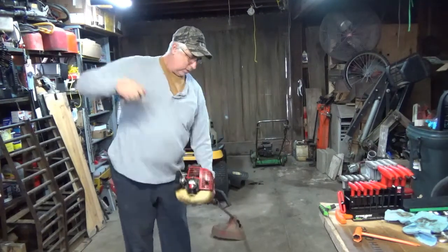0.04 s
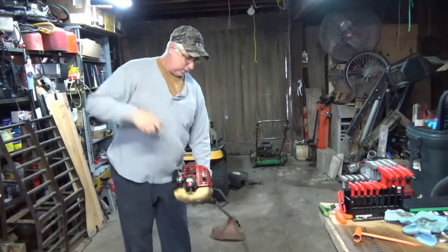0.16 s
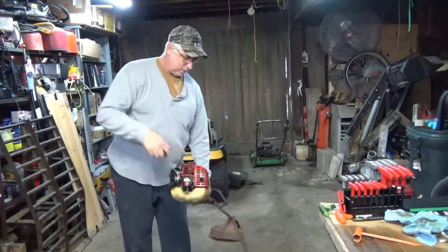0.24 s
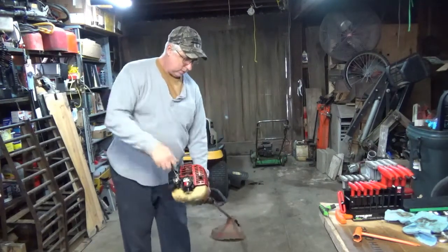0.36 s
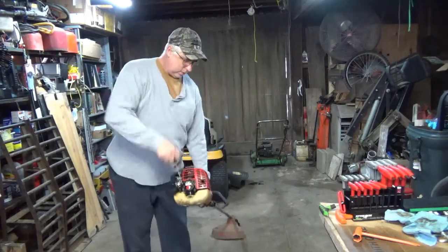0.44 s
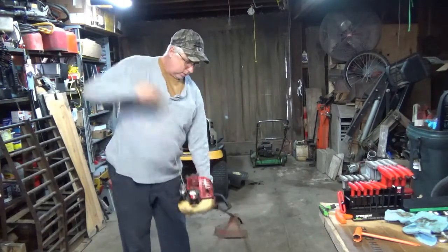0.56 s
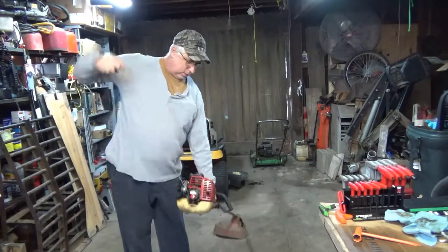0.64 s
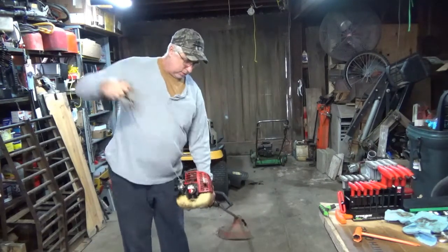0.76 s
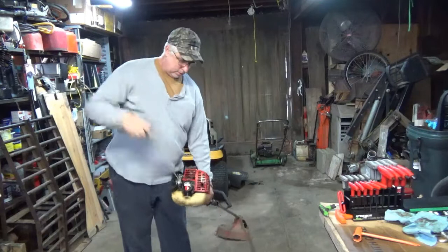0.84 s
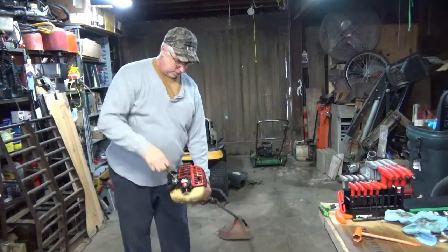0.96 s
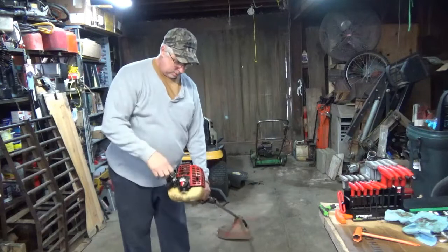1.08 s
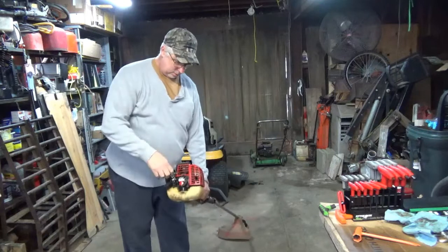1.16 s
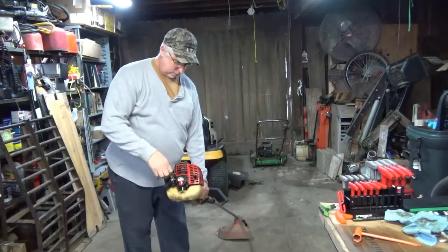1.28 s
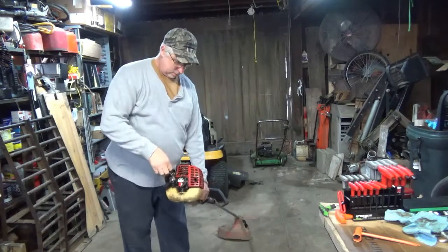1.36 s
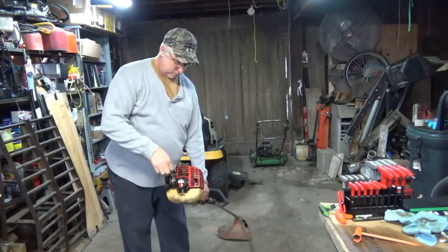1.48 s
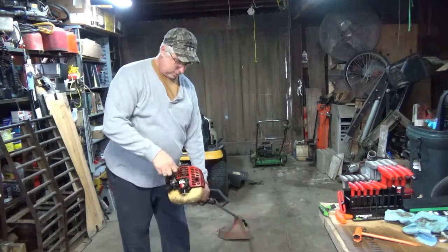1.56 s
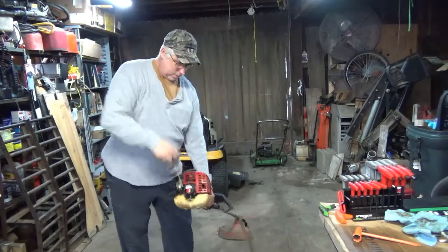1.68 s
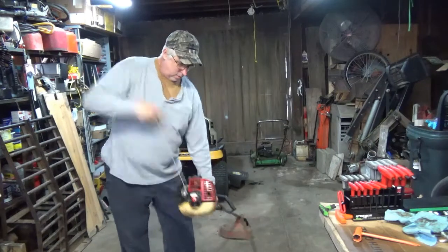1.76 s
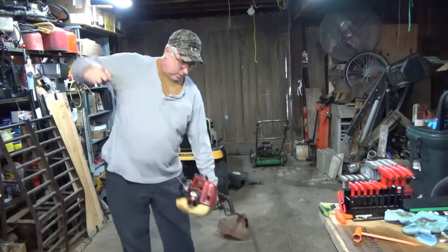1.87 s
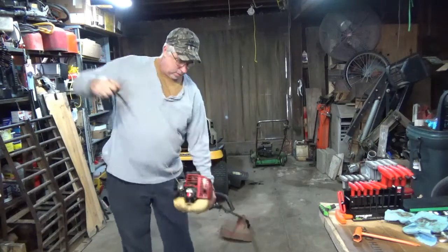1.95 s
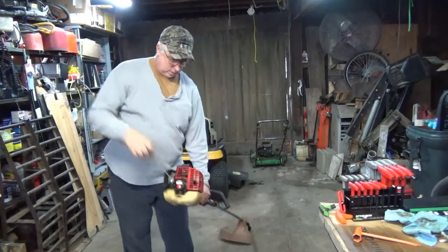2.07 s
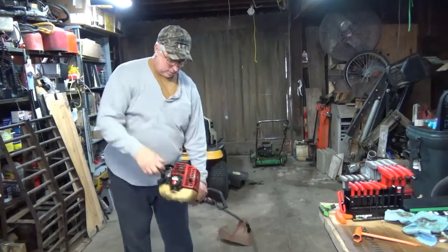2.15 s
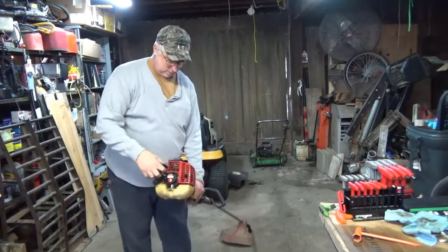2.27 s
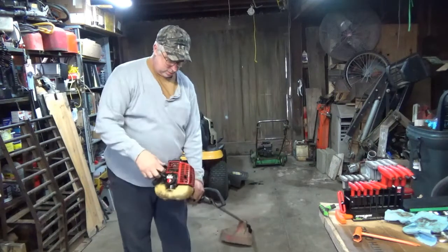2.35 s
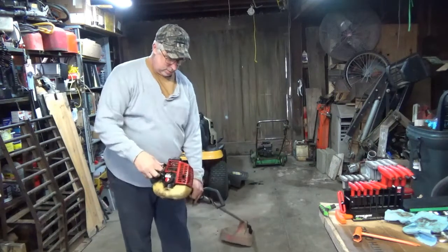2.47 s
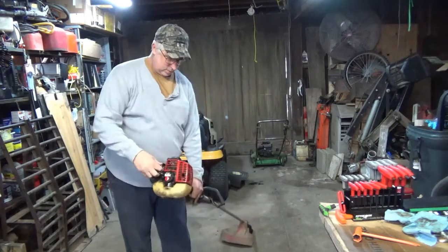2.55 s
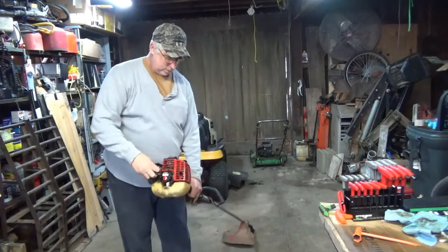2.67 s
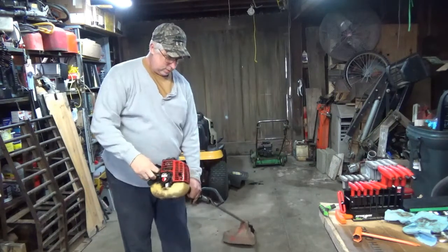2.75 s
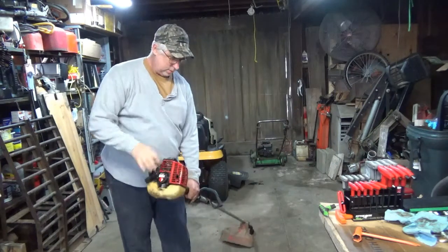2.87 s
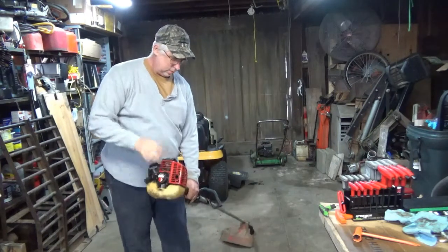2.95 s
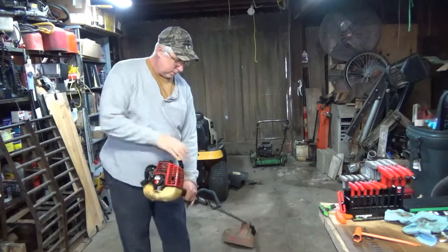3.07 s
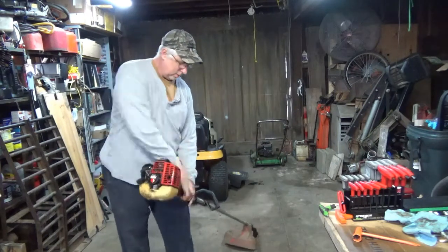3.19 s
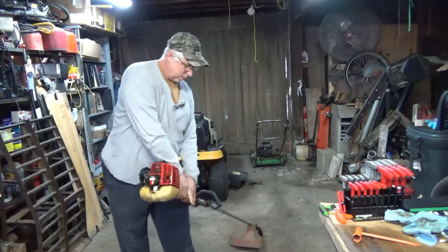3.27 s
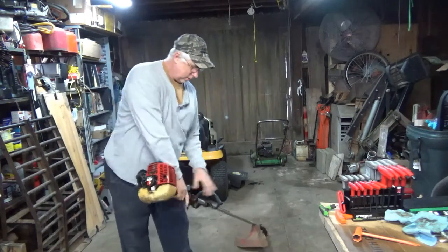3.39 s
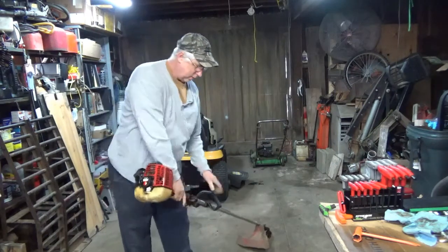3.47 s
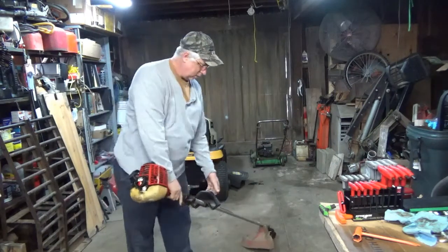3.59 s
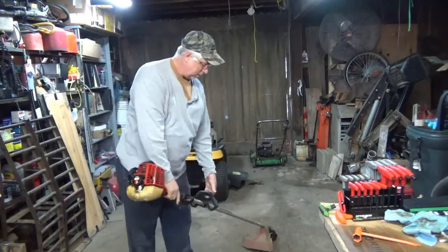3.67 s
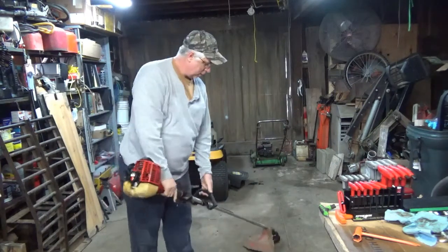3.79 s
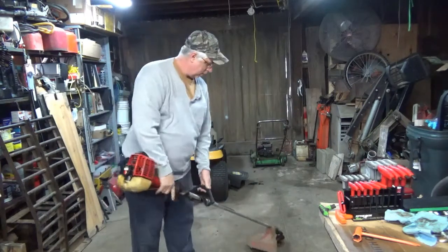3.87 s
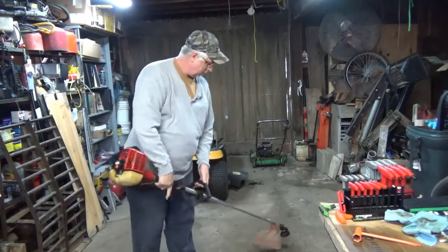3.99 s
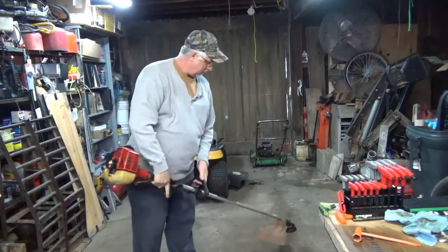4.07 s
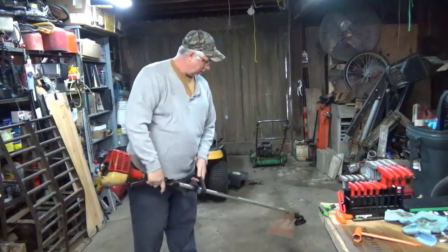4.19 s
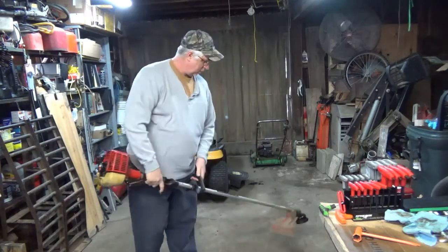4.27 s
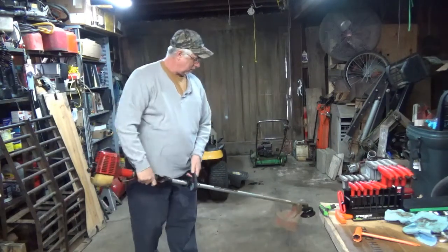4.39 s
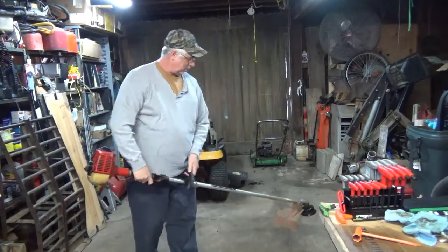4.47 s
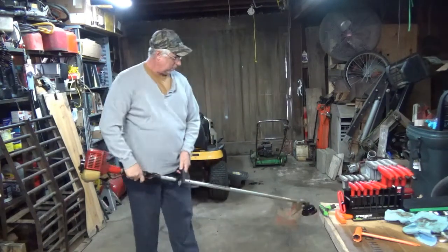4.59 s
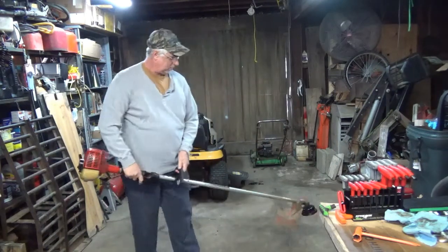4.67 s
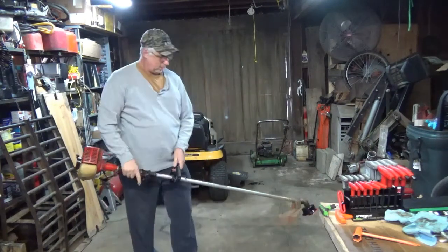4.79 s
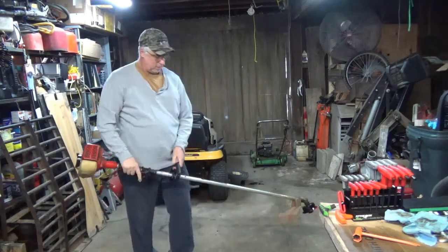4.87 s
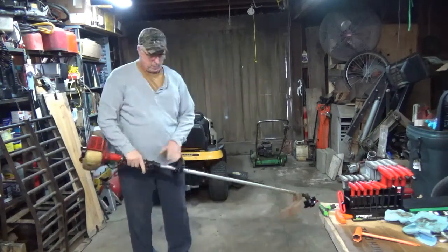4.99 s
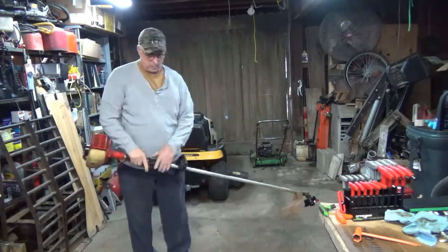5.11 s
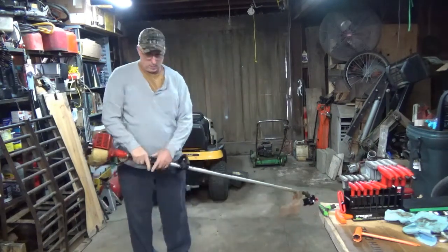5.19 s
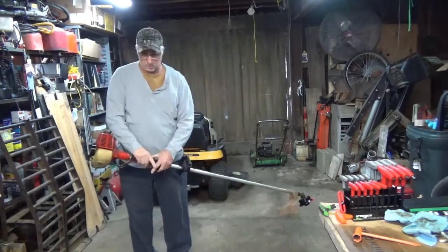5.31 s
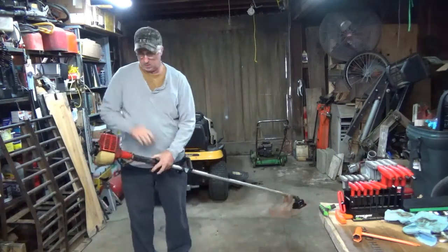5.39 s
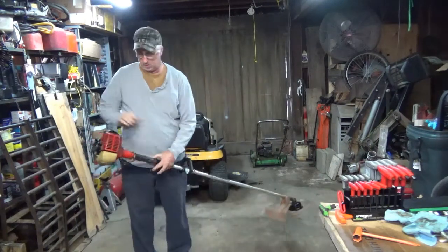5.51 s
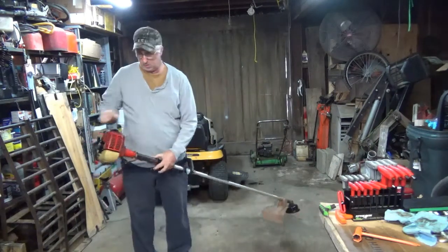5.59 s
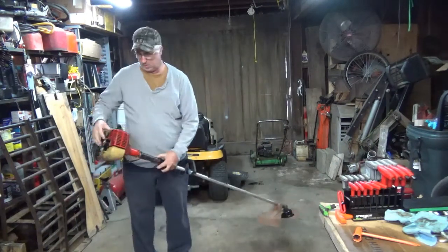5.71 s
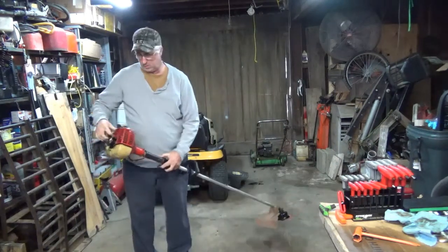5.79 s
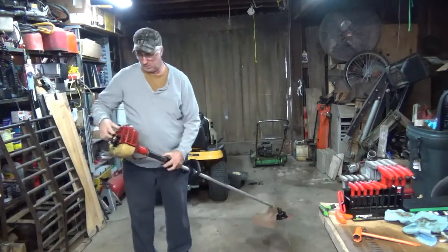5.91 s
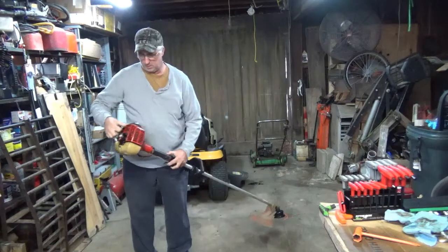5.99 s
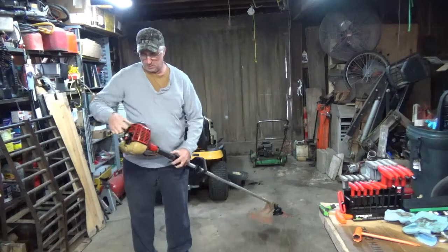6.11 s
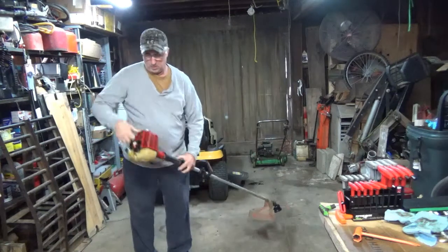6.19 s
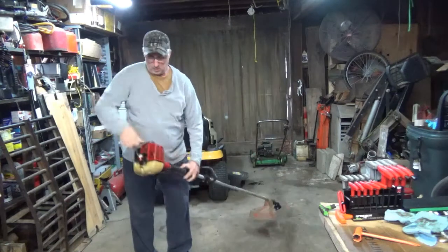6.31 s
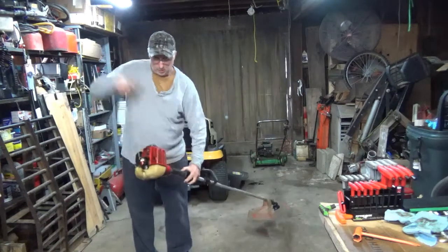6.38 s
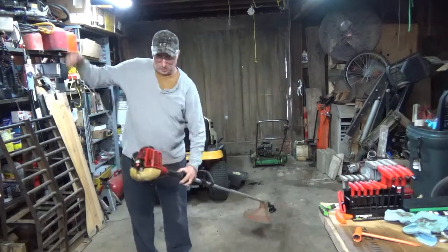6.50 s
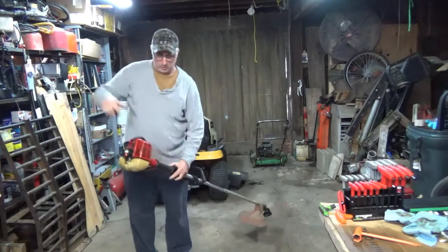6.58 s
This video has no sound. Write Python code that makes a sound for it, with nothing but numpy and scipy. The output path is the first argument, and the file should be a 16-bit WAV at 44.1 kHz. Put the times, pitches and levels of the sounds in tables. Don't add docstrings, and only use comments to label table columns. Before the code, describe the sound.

Stereo microphone at a few metres, hard-walled barn. Brief engine churns and sharp starter clatter come twice, each followed by small metallic pings. After a short gap with faint cloth movement, a knock and a pull set off nearly three seconds of rough, buzzing two-stroke running, its pitch sagging until it dies abruptly. Echo fades into still air; soft hand taps lead to a final loud pull.

```python
import sys
import numpy as np
from scipy import signal
from scipy.io import wavfile
from scipy.ndimage import uniform_filter1d

SR = 44100
rng = np.random.default_rng(int(sys.argv[2]) if len(sys.argv) > 2 else 0)


def undo_db(level):
    steps = np.asarray(level, float) / 20
    return 10 ** steps


def generate_wav(signal):
    frames = np.transpose(np.atleast_2d(signal))
    scaled = np.clip(frames, -1, 1) * 32767
    pcm = np.round(scaled).astype(np.int16)
    wavfile.write(sys.argv[1], SR, pcm)


N = 293265
T = np.arange(N) / SR

# (frequency [Hz], level [dB per Hz])
AIR_SPECTRUM = [(18, -69), (30, -41), (75, -14), (98, -2.5), (179, -14), (295, -4), (988, -3.5),
                (1320, -4.5), (3220, -10), (9460, -13), (16000, -28)]
# (pitch [Hz], throbs [per s], level [dB])
CRICKET = (3400, 33, -73)
# (time [s], speed [turns per s])
PULLED_SPEED = [(0, 31.8), (.4, 10.8), (.53, 30.3), (.7, 30), (1.1, 8.8), (1.72, 30)]
RUNNING_SPEED = [(1.76, 56), (1.9, 54.3), (2.05, 54.6), (2.15, 53), (2.35, 55), (2.52, 56), (2.66, 50),
                 (2.85, 52), (3.05, 55.5), (3.25, 50), (3.45, 45), (3.55, 45.5), (3.68, 44.6), (3.9, 45.3),
                 (4.15, 45), (4.35, 43), (4.5, 40)]
LAST_PULL_SPEED = [(6.4, 24.93), (6.5, 50.4), (6.65, 65.27)]
BEATS = [2.599, 2.717, 2.969, 3.074, 3.128, 3.326, 3.472, 3.649, 3.872, 3.944, 4.073, 4.163, 4.299]
# (start [s], end [s])
FIRING_S = (1.8, 4.5)
# (first compression [s], length [s], exhaust [dB], clatter [dB], outlet note [Hz])
SPELLS = [
    (-.05, 0.25, -24.5, -25, 440),
    (0.539, 0.21, -22.5, -21.5, 560),
    (1.759, 2.772, -26.5, -23, 600),
    (6.413, .3, -28.5, -23, 860),
]
# (exhaust [dB per s], clatter [dB per s])
RUN_DOWN = (159, 169)
# (time [s], strength of the burn [dB], shaking of the frame [dB])
LOAD = [(1.8, 1.5, -0.5), (2.1, 2, 1), (2.35, 2.5, 1.5), (2.6, -1, -0.5), (3.0, 0.5, 1), (3.5, 0, 1.5),
        (4.1, 0, -1.5), (4.3, 2, 1), (4.4, -4, -1), (4.5, -2.5, -2.5)]
# (frequency [Hz], level [dB per Hz])
MUFFLER = [(35, -50), (110, -24), (165, -11), (220, -8), (290, -9), (395, -4), (510, -8), (600, -5),
           (720, -9), (1350, -9), (1700, -20), (3500, -80)]
# (frequency [Hz], level [dB per Hz])
CASING = [(530, -32), (900, -6.5), (1350, -1.5), (1540, -2.5), (2660, -2.5), (4950, -4.5), (5460, -7),
          (6500, -6), (8450, -39), (14300, -120)]
FINS = [(5500, -19), (6300, -5), (7500, 2.5), (9500, 1.5), (10900, -5.5), (13000, -0.5), (16000, 2)]
# (frequency [Hz], width [Hz], level [dB])
FIN_MODES = [(5500, 560, -3.5), (10200, 350, -5.5), (12500, 250, -8), (7100, 73, -9), (2560, 420, -9.5)]
# (time [s], resonance [Hz])
PANEL = [(.5, 2800), (1.0, 4200), (1.8, 2590), (2.35, 3600), (3.07, 4240), (3.45, 2600), (4.3, 2696)]
FINE_RATTLE_DB = [2, -1.5, 2, 5.5]
# (start [s], length [s], level [dB])
CORD = [(0.183, .19, -34), (0.485, .09, -27), (0.79, .09, -25), (0.931, .1, -29), (1.709, .09, -22),
        (6.362, .085, -31.5)]
# (start [s], length [s], level [dB], frequency [Hz], width [Hz])
BUZZES = [(.575, 0.034, -23.5, 1990, 1490), (0.794, 0.06, -25, 2570, 905), (1.79, 0.022, -22, 2190, 1200),
          (2.24, 0.14, -25.5, 3450, 800), (2.454, 0.15, -27, 4100, 900), (2.721, 0.03, -34, 2500, 800),
          (3.063, 0.031, -21.5, 4200, 1000), (3.24, 0.024, -23, 2970, 900),
          (3.416, 0.023, -21.5, 2370, 1100), (3.46, 0.023, -24, 2770, 900), (3.615, .02, -30, 2300, 800),
          (3.801, 0.058, -33, 5400, 600), (4.082, 0.095, -28, 5350, 600), (4.201, 0.091, -29, 5360, 600),
          (4.4, .05, -30.5, 5350, 400), (4.512, .06, -31, 2400, 300), (4.89, .045, -69, 4850, 80.4),
          (4.965, .04, -46, 2190, 900), (4.946, .1, -49.5, 7000, 8000), (6.025, .035, -67, 5500, 50),
          (6.021, .025, -50, 8720, 150), (6.018, 0.034, -57, 7400, 200), (6.305, 0.02, -62, 6760, 60),
          (6.301, .04, -63, 3140, 200), (6.306, .04, -67, 10200, 200), (6.449, 0.14, -24, 830, 400),
          (6.48, .03, -24, 5540, 200), (6.62, .03, -31, 1310, 300), (3.615, 0.12, -26.5, 1346, 60),
          (3.868, .08, -29.5, 1333, 40.2), (4.232, 0.07, -30, 1338, 40.1), (4.506, 0.052, -29, 1337, 40),
          (5.956, 0.038, -61.5, 636, 60), (5.956, .03, -55, 1490, 250), (6.365, 0.018, -32, 1895, 119.8),
          (0, 0.042, -30.5, 5140, 99.7), (1.027, 0.031, -37.5, 4490, 79.9), (0.967, 0.11, -43.5, 674, 90.8),
          (1.85, .3, -25.5, 599, 90), (6.066, 0.052, -47, 1425, 60)]
# (start [s], length [s], level [dB], from [Hz], to [Hz])
FOLDS = [(1.26, 0.1, -64.5, 4700, 4200), (1.28, 0.064, -61, 3600, 2900), (1.47, 0.098, -68, 4300, 4500),
         (1.5, .13, -60.5, 3660, 3150)]
# (time [s], peak [dB], frequency [Hz])
CHUGS = [(.005, -18.5, 560), (0.031, -15, 390), (.065, -19, 400), (.13, -19, 600), (0.136, -21.5, 280),
         (.17, -22.5, 300), (.543, -10.5, 400), (0.551, -21, 229.7), (.63, -19.5, 239), (.76, -21.5, 201.3),
         (6.416, -23.5, 230), (.575, -21, 300), (.62, -15.5, 400), (.642, -17.5, 600), (.69, -16, 850),
         (0.714, -14.5, 400), (.755, -20.5, 330), (.813, -11, 650), (.862, -16, 660), (1.761, -15, 400),
         (1.766, -13.5, 590), (2.168, -20, 230), (2.302, -19.5, 250), (2.592, -23, 230), (2.71, -22.5, 240),
         (2.962, -21, 230), (3.067, -23.5, 230), (4.29, -13, 410), (6.414, -17, 400), (6.549, -15.5, 420),
         (6.602, -16.5, 420)]
# (frequency [Hz], width [Hz], level [dB])
CUP_MODES = [(6265, 60, 0), (4517, 45, -12), (5410, 30, -17), (3208, 50, -16), (7337, 30, -18),
             (10130, 30, -17), (14060, 30, -16)]
# (time [s], level [dB])
CUP_HITS = [(.0887, -21.5), (.171, -14.5), (.186, -19.5), (0.3334, -26.5), (0.3857, -27), (.8051, -17),
            (0.824, -18.5), (.84, -14.5), (0.949, -18.5), (0.9998, -12.5), (1.035, -25.5)]
# (time [s], peak [dB], body [Hz], brightness [dB], thump over body [dB])
KNOCKS = [(0.089, -20.5, 1520, 4, -23), (0.168, -27, 790, 14, -9), (0.49, -14, 1220, -8, -35),
          (0.783, -22.5, 2020, -13, -26), (0.947, -20.5, 710, 11, -25), (0.999, -35, 660, -2, -37),
          (1.352, -32, 1380, -11, -12), (1.584, -43.5, 611, -30, 4), (1.710, -14, 1250, -2.5, -20),
          (4.505, -13, 1341, -8, -30), (4.776, -44, 1580, -7.5, -18), (4.948, -41.5, 1970, -3, -19),
          (4.967, -43.5, 1920, 2, 0), (5.199, -53.5, 1355, -3, -21.5), (5.317, -52, 2000, 1.5, -13),
          (5.4, -48.5, 1340, 8, -15), (5.506, -63.5, 1660, -9, -19.5), (5.79, -45, 1480, -5, -3),
          (5.957, -53, 1540, -17.5, -18), (6.024, -42.5, 1300, -7, -17), (6.067, -38.5, 1410, -3.5, -13),
          (6.305, -51.5, 3180, -7, -31), (6.364, -16, 1850, 0.5, -19), (6.444, -13, 830, 2.5, -14)]
# (time [s], peak [dB],
# frequency [Hz])
PAWL_PINGS = [(0.0892, -18, 9980), (0.1, -13, 9460), (0.168, -15, 8440), (0.181, -9, 7860),
              (0.2663, -20, 9450), (0.3112, -21.5, 8240), (0.3326, -20, 7030), (0.416, -26.5, 8810),
              (0.4888, -16, 9430), (0.5781, -19, 7790), (0.6, -14, 9500), (0.6669, -12.5, 9200),
              (0.7831, -10.5, 8740), (0.813, -15.5, 3000), (0.828, -18, 8070), (0.3835, -30, 7100),
              (0.359, -21, 8360), (0.969, -15.5, 8500), (0.984, -23.5, 8880), (1.059, -23, 8240),
              (0.9078, -20, 8620), (0.9303, -26.5, 8360), (0.9433, -20.5, 7650), (1.0331, -18.5, 9020),
              (1.1074, -30, 8480)]
MORE_PINGS = [(1.7953, -12.5, 9150), (1.8911, -10, 9820), (1.9096, -10, 10200), (1.9644, -14, 7170),
              (2.0009, -11, 7190), (2.1116, -12, 7090), (2.2448, -11, 10500), (2.2638, -14, 7900),
              (2.3226, -14, 7920), (2.6299, -12.5, 8660), (2.9726, -12, 8560), (3.2595, -14.5, 8510),
              (3.277, -14.5, 10400), (3.6172, -12, 9030), (3.6686, -16, 7390), (3.7135, -13, 10100),
              (3.7229, -11, 8680), (3.8462, -13, 9730), (3.9384, -11.5, 8580), (4.2198, -10.5, 7960),
              (4.2547, -14, 8500), (4.3919, -14.5, 8650), (4.4613, -14.5, 6930)]
STRAY_PINGS = [(1.653, -50, 8060), (1.683, -45.5, 8580), (1.8107, -12.5, 9310), (2.0389, -15.5, 5700),
               (2.0931, -13, 10540), (3.099, -13.5, 10200), (3.219, -13.5, 10320), (3.3387, -12, 9850),
               (3.5343, -14.5, 10530), (3.9155, -14, 10200), (3.9598, -14.5, 10200), (4.0032, -11, 9620),
               (4.0487, -12.5, 9000), (4.3152, -15, 9660), (4.3386, -11, 7100), (4.4335, -15, 8110),
               (4.4819, -13.5, 2615), (5.3, -64, 9000), (6.4156, -19, 9100)]
# (start [s], pings [count], peak [dB])
CHATTER = [(2.1843, 1, -9), (2.2976, 1, -12), (2.4303, 1, -15), (2.4787, 4, -8.5), (2.6049, 1, -17.5),
           (2.7456, 3, -11.5), (2.8603, 3, -8.5), (2.9995, 3, -12), (3.1232, 1, -18.5), (3.1771, 2, -13.5),
           (3.444, 1, -13), (3.6964, 2, -16), (3.8994, 1, -15.5), (4.0795, 1, -11)]
# (start [s], length [s], level [dB])
CUP_RINGS = [(.17, 0.045, -26), (.33, 0.083, -38), (.49, .02, -41.5), (.787, 0.063, -21.5),
             (.947, .09, -28.5), (1.709, 0.012, -39), (6.363, 0.081, -40.5)]
HOUSING_RINGS = [(.49, .01, -29), (.81, 0.051, -19.5), (1.0, 0.056, -44.5), (1.586, 0.15, -50),
                 (5.958, 0.12, -60)]
# (loudest [s], level [dB], centre [Hz], swell [dB per s], fade [dB per s])
SLEEVE = [(1.345, -56, 3420, 200.5, 903), (1.69, -56, 2500, 100, 900), (4.79, -53.5, 3000, 905, 40),
          (4.975, -42.5, 2270, 900, 173), (5.326, -53, 3430, 700, 95), (6.068, -48.5, 2300, 800.5, 92)]
# (start [s], length [s], hum over the exhaust [dB])
STEADY = [(1.8, .72, -4), (2.55, .9, -8), (3.46, .64, -5), (4.15, .3, -8), (6.5, 1, -8)]
# (multiple of crank speed, level [dB])
FAST_HUM = [(1, -37), (2, -27), (3, -4), (4, -3), (5, -20), (6, -14), (7, -11), (8, -15), (9, -12),
            (10, -3), (11, 0), (12, -6)]
SLOW_HUM = [(0.5, -27), (1, -29), (1.5, -30), (2, -27), (2.5, -24), (3, -15), (3.5, -14), (4, -6),
            (4.5, -9), (5, 0), (5.5, -7), (6, -13), (6.5, -1), (7, -4), (7.5, -9), (8, -6), (8.5, -5),
            (9, -1), (9.5, -6), (10, -7)]
# (start [s], end [s])
RHYTHM_CHANGE_S = (2.7, 3.45)
# (start [s], length [s], level [dB])
FIN_SONG = [(2.2, .25, -30.5), (2.45, .43, -25.5), (2.95, .27, -33), (3.7, .08, -24), (4.06, .04, -25.5),
            (4.41, 0.061, -33)]
# (start [s], length [s], level [dB])
DRUM_RINGS = [(3.6, 0.22, -29), (3.87, .05, -32), (4.06, 0.13, -27), (4.23, 0.054, -23.5),
              (4.506, .02, -23), (6.068, 0.025, -42)]
# (frequency [Hz], t60 [s])
BARN = [(100, 0.36), (500, 0.49), (2000, 0.41), (6000, 0.31), (14000, 0.27)]
# (frequency [Hz], left minus right [dB])
LEAN = [(60, 3.5), (160, -3.5), (350, -2.5), (700, -1.3), (1500, 0.5), (16000, 1)]
# (frequency [Hz], level [dB])
MIC = [(20, -2), (90, -7.5), (150, -2.5), (10900, -3), (11100, -10.5), (15800, -20), (16200, -70),
       (22050, -88)]


def evened(x):
    return x / np.sqrt(np.mean(x ** 2) + 1e-20)


def read(points, hz):
    f, value = np.transpose(points)
    return np.interp(np.log(hz + 1), np.log(f + 1), value)


def colour(x, points, size=4096):
    log_gain = np.log(undo_db(read(points, abs(np.fft.fftfreq(size, 1 / SR)))))
    taps = np.fft.ifft(np.exp(log_gain - 1j * signal.hilbert(log_gain).imag)).real
    return signal.oaconvolve(x, taps[:size // 2])[:len(x)]


def resonate(x, hz, width):
    turn = np.exp(2j * np.pi * np.cumsum(hz * np.ones(len(x))) / SR)
    r = np.exp(-np.pi * width / SR)
    return 2 * (turn * signal.lfilter([1 - r], [1, -r], x / turn + 1e-18)).real


def modes(x, table):
    return evened(sum(undo_db(db) * resonate(x, hz, width) / np.sqrt(width) for hz, width, db in table))


def clicks(per_s, spread_db):
    size = undo_db(spread_db * np.minimum(rng.exponential(1, N), 4)) * rng.choice([-1, 1], N)
    return size * (rng.random(N) < per_s / SR)


def waver(depth_db):
    coarse = uniform_filter1d(rng.standard_normal(len(T[::2048])), size=3)
    return undo_db(depth_db * evened(np.interp(T, T[::2048], coarse)))


def bouts(rows, fall_db_per_s, rise_db_per_s=20000):
    power = 0
    for start, length, db in rows:
        rise = rise_db_per_s * np.clip(start - T, 0, 1)
        fall = fall_db_per_s * np.clip(T - start - length, 0, 3)
        power = power + undo_db(db - rise - fall) ** 2
    return np.sqrt(power)


def lay(out, s, sound):
    out[round(s * SR):][:len(sound)] += sound


def air():
    shared, left, right = (evened(colour(n, AIR_SPECTRUM)) for n in rng.standard_normal((3, N)))
    hz, per_s, db = CRICKET
    chirp = np.exp(-(per_s * T % 1) / .2) * resonate(rng.standard_normal(N), hz, 500)
    return undo_db(-63) * evened(shared + 1.3 * np.array([left, right])) + undo_db(db) * evened(chirp)


def crank():
    speed = np.interp(T, *np.transpose(PULLED_SPEED + RUNNING_SPEED + LAST_PULL_SPEED))
    free = np.cumsum(speed) / SR
    at = np.interp(BEATS, T, free)
    whole = np.round(at[0]) + np.cumsum(np.round(np.diff(at, prepend=at[0])))
    turns = free + np.interp(T, BEATS, whole - at)
    latest = np.append(0, whole)[np.searchsorted(whole, turns + .5)]
    return turns, turns - latest, speed


def since():
    starts = np.transpose(SPELLS)[0]
    index = np.maximum(np.searchsorted(starts, T) - 1, 0)
    return T - starts[index], index


def loaded(index):
    return undo_db(np.interp(T, *np.transpose(LOAD)[[0, index]], left=0) * (since()[1] == 2))


def blowing():
    rows = [row[:3] for row in SPELLS]
    return loaded(index=1) * bouts(rows, fall_db_per_s=RUN_DOWN[0], rise_db_per_s=1500)


def exhaust(turns, beat, speed):
    rough = .83
    cold_hz, open_s = 460, .04
    firing = (T > FIRING_S[0]) & (T < FIRING_S[1])
    missed = np.where(firing, np.clip(.6 - .045 * (speed - 45), 0, .6), .1)
    count = turns.astype(int)
    luck = undo_db(1.5 * rng.standard_normal(count[-1] + 1))[count]
    size = luck * (1 - missed * (np.floor(beat) % 2))
    baffles = rng.standard_normal(2000) * undo_db(-60 * T[:2000] / .05)
    pops = signal.oaconvolve(size * np.diff(count, prepend=0), baffles)[:N]
    gas = np.sqrt(size) * (1.3 + np.exp(-(turns % 1) / 0.15)) * rng.standard_normal(N)
    drive = np.sqrt(1 - rough) * evened(pops) + np.sqrt(rough) * evened(gas)
    age, index = since()
    hz = cold_hz + (np.transpose(SPELLS)[-1][index] - cold_hz) * (1 - np.exp(-age / open_s))
    outlet = evened(resonate(np.roll(drive, 300), hz, 280))
    cold = undo_db(11.5 * np.exp(-age / 0.23) + 3 * np.exp(-age / .03))
    cold = cold * (1 + np.clip(hz / 600 - 1, 0, 1)) ** 2
    return blowing() * waver(1.81) * (evened(colour(drive, MUFFLER)) + 0.2 * cold * outlet)


def clatter(turns):
    lag_s, wobble_db = .036, 1.81
    slap = 0.31 + 0.7 * np.exp(-(turns % 1) / 0.11) + .5 * np.exp(-(3 * turns % 1) / 1.5)
    body = slap * rng.standard_normal(N) + .5 * evened(clicks(700, spread_db=4.5))
    s, hz = np.transpose(PANEL)
    facing = sum(np.exp(-((T - at) / 0.04) ** 2) for at in s)
    casing = evened(colour(body, CASING))
    casing = casing + undo_db(-12 + 3.5 * facing) * resonate(casing, np.interp(T, s, hz), 990)
    fine = slap * rng.standard_normal(N) + .4 * evened(slap * clicks(600, spread_db=3.5))
    fins = evened(colour(fine, FINS)) + 0.46 * modes(clicks(200, spread_db=3.0), FIN_MODES)
    shaken = [(s + lag_s, length - lag_s, db) for s, length, _, db, _ in SPELLS]
    spun = bouts(shaken, fall_db_per_s=RUN_DOWN[1]) * loaded(index=2)
    cord = bouts(CORD, fall_db_per_s=RUN_DOWN[1])
    fine_spun = undo_db(FINE_RATTLE_DB)[since()[1]] * spun
    fine_gain = np.hypot(fine_spun, undo_db(-2) * cord) * waver(wobble_db)
    return undo_db(-2.0) * np.hypot(spun, cord) * waver(wobble_db) * casing + fine_gain * evened(fins)


def buzzes():
    out, t = np.zeros(N + SR), T[:2 * SR // 5]
    rows = [(s, length, db, hz, hz, width) for s, length, db, hz, width in BUZZES]
    rows += [(*row, 450) for row in FOLDS]
    for s, length, db, from_hz, to_hz, width in rows:
        hz = np.interp(t, (0, length), (from_hz, to_hz))
        grit = rng.standard_normal(len(t)) * rng.exponential(1, len(t))
        grit[0] += np.sqrt(SR / width)
        shape = np.minimum(t / 0.0021, 1) * undo_db(db - 499.5 * np.maximum(t - length, 0))
        buzz = resonate(resonate(grit, hz, 1.5 * width), hz, 1.5 * width)
        lay(out, s, shape * evened(buzz))
    return out[:N]


def muffler_thumps():
    out, t = np.zeros(N + SR), T[:SR // 4]
    for s, db, hz in CHUGS:
        fade = undo_db(db - 60 * t * hz / 33)
        lay(out, s, fade * np.minimum(t * hz, 1) * np.sin(2 * np.pi * hz * t))
    return out[:N]


def cup_blows():
    out, t = np.zeros(N + SR), T[:SR // 4]
    for s, db in CUP_HITS:
        ring = 0
        for hz, width, level in CUP_MODES:
            fade = undo_db(level + 3 * rng.standard_normal() - 60 * t * width / 4.4)
            ring = ring + fade * np.sin(2 * np.pi * hz * t)
        lay(out, s, undo_db(db) * ring)
    return out[:N]


def knocks():
    out, t = np.zeros(N + SR), T[:SR // 4]
    for s, db, hz, treble_db, thump_db in KNOCKS:
        t60 = max(0.052 - 0.0066 * treble_db - 0.0064 * (db + 11), .02)
        shape = [(130, thump_db - 25.5), (300, thump_db + 1.5), (480, thump_db + 9.0), (hz, 0), (4500, -7),
                 (6000, treble_db + 0.5), (12000, treble_db - 8.0), (16000, treble_db - 6.5)]
        noise = rng.standard_normal((2, len(t)))
        burst = undo_db(-60 * t / t60) * evened(colour(noise[0], shape, size=1024))
        ring = undo_db(-12.0 - 60 * t / (1.8 * t60)) * evened(resonate(noise[1], hz, 130))
        attack = np.minimum(t / .001, 1) * (0.56 + 0.7 * np.exp(-t / 0.0058))
        lay(out, s, undo_db(db + 1.5) * (burst + ring) * attack)
    return out[:N]


def chatter():
    gap_s, fin_hz = .026, 8620
    pings = [(s + k * gap_s, db) for s, count, db in CHATTER for k in range(round(count))]
    luck = rng.standard_normal((len(pings), 2))
    return [(s, db + 2.5 * a, fin_hz * (1 + .015 * b)) for (s, db), (a, b) in zip(pings, luck)]


def pings():
    out, t = np.zeros(N + SR), T[:1500]
    for s, db, hz in chatter() + STRAY_PINGS + PAWL_PINGS + MORE_PINGS:
        noise = evened(resonate(rng.standard_normal(len(t)), hz, 4500))
        tick = 1.1 * undo_db(-60 * t / 0.0074) * noise
        ring = 1.4 * undo_db(-60 * t / 0.016) * np.sin(2 * np.pi * hz * t)
        lay(out, s, undo_db(db - 4.5) * (ring + tick))
    return out[:N]


def ratchet_rings():
    ratchet = clicks(500, spread_db=3.0)
    cup = undo_db(1.5) * bouts(CUP_RINGS, fall_db_per_s=260.0) * modes(ratchet, CUP_MODES)
    housing = evened(resonate(ratchet, 670, 70))
    return cup + undo_db(-2.0) * bouts(HOUSING_RINGS, fall_db_per_s=250) * housing


def sleeve():
    s, _, hz, *_ = np.transpose(SLEEVE)
    hiss = resonate(rng.standard_normal(N), np.interp(T, s, hz), 1500)
    brush = sum(bouts([(s, 0, db)], fade, swell) for s, db, _, swell, fade in SLEEVE)
    return undo_db(-3.5) * uniform_filter1d(brush, 900) * evened(hiss)


def hum_stack(turns, orders):
    total = 0
    for k, db in orders:
        stray = min(k / 9, 1) ** 2 * rng.uniform(-0.46, 0.59)
        total = total + undo_db(db) * waver(1.8) * np.cos(2 * np.pi * (k * turns + stray))
    return evened(total)


def hum(turns):
    fast, slow = (hum_stack(turns, orders) for orders in (FAST_HUM, SLOW_HUM))
    change_s = (*RHYTHM_CHANGE_S, FIRING_S[1] + 1, LAST_PULL_SPEED[0][0])
    mix = np.interp(T, change_s, (0, np.pi / 2, np.pi / 2, 0))
    burning = bouts(STEADY, 200, 200)
    steady = uniform_filter1d(blowing(), size=3000)
    return steady * burning * (np.cos(mix) * fast + np.sin(mix) * slow)


def fin_song():
    ring = evened(resonate(clicks(250, spread_db=1.5), 8630, 170))
    gain = bouts(FIN_SONG, fall_db_per_s=75.5, rise_db_per_s=201.5) * (T < FIRING_S[1])
    return undo_db(-1.5) * gain * ring


def clutch_drum():
    ring = evened(resonate(clicks(200, spread_db=4.5), 1350, 35))
    return undo_db(-5.5) * bouts(DRUM_RINGS, fall_db_per_s=234, rise_db_per_s=4001.5) * ring


def barn(x):
    taps = np.zeros((3, SR))
    at = np.arange(240, SR - 20, 20) + rng.integers(0, 20, (3, (SR - 241) // 20))
    np.put_along_axis(taps, at, rng.choice([-1., 1.], at.shape), 1)
    hz, t, z = signal.stft(taps[:2] * 1.6 + taps[2], SR, nperseg=256)
    tail = signal.istft(z * undo_db(-60 * t / read(BARN, hz)[:, None]), SR, nperseg=256)[1]
    return signal.fftconvolve(x[None], tail / np.linalg.norm(tail[0]), axes=1)[:, :N]


def scene():
    turns, beat, speed = crank()
    machine = exhaust(turns, beat, speed) + clatter(turns) + buzzes() + muffler_thumps()
    machine = machine + cup_blows() + knocks() + pings() + ratchet_rings()
    machine = machine + sleeve() + fin_song() + clutch_drum()
    drone = hum(beat)
    angle = 2 * np.pi * 1.3 * T
    echoes = sum(barn((machine + 0.24 * drone) * blend(angle)) for blend in (np.cos, np.sin))
    return undo_db(-0.5) * machine + undo_db(-8.5) * echoes + drone + air()


def top_cut(x):
    return signal.sosfilt(signal.butter(12, 16270, fs=SR, output="sos"), x)


def record(dry):
    sides = [[(hz, side * db / 2) for hz, db in LEAN] for side in (1, -1)]
    heard = np.array([colour(colour(x, lean), MIC) for x, lean in zip(dry, sides)])
    return top_cut(0.9 * np.tanh(heard / 0.73))


dry = scene()
out = record(dry)
generate_wav(out)
```